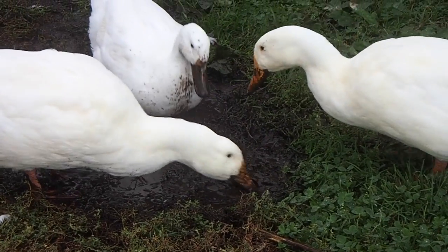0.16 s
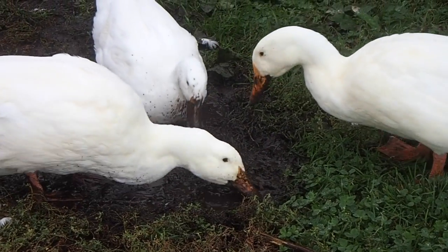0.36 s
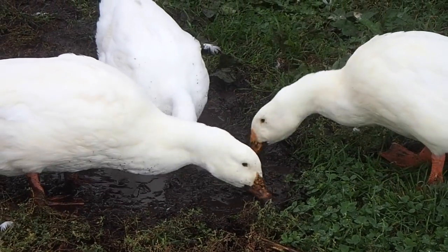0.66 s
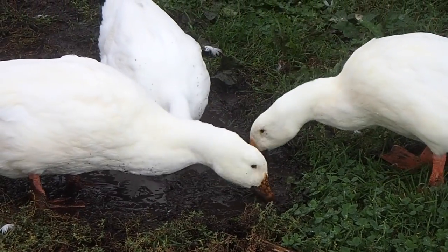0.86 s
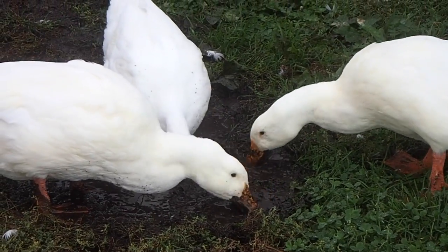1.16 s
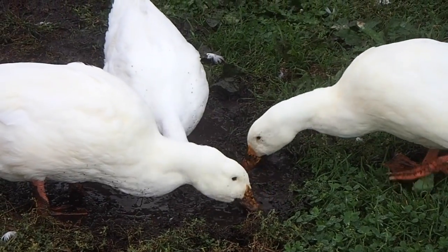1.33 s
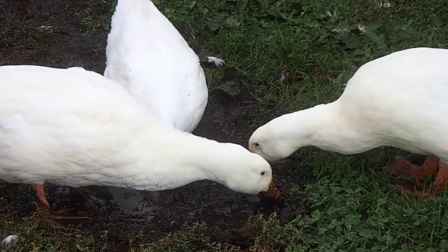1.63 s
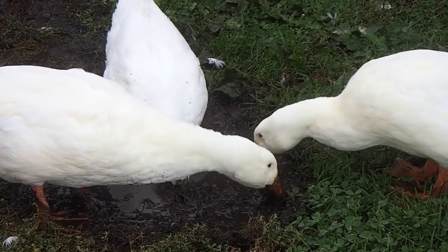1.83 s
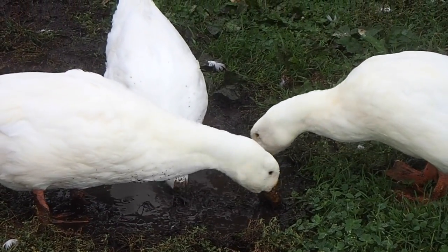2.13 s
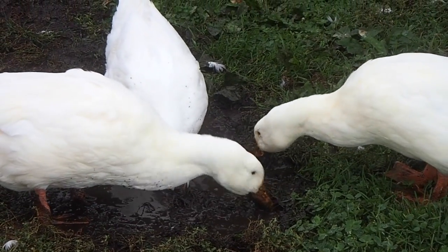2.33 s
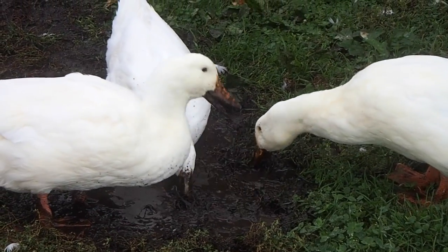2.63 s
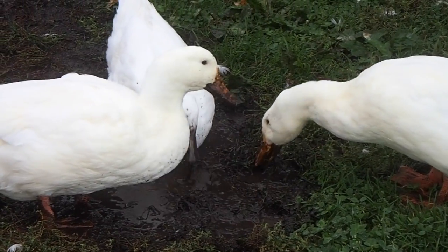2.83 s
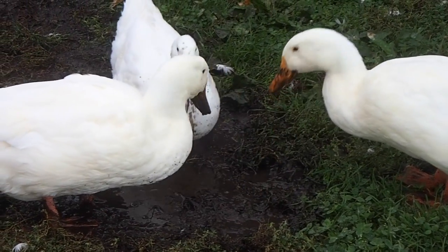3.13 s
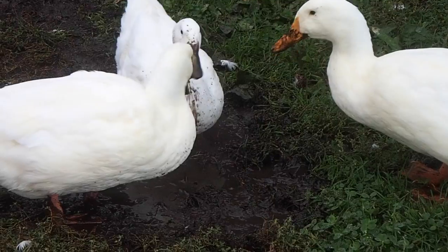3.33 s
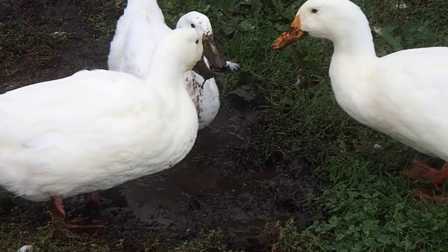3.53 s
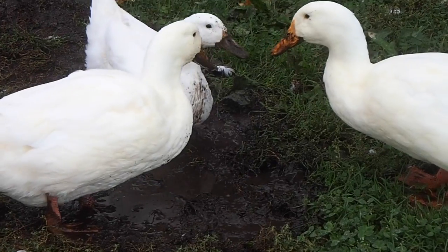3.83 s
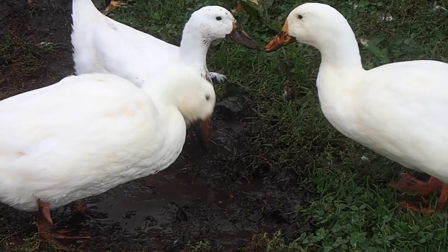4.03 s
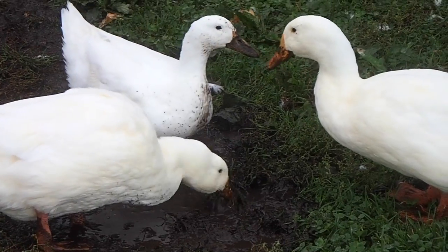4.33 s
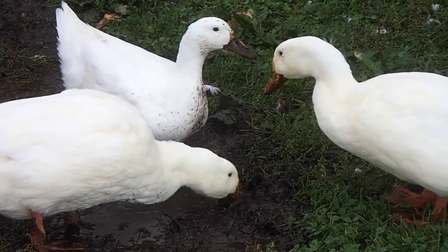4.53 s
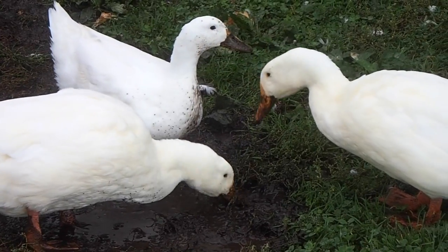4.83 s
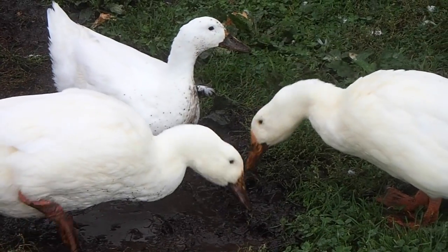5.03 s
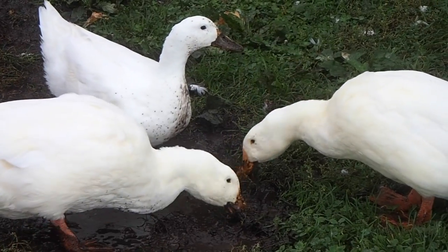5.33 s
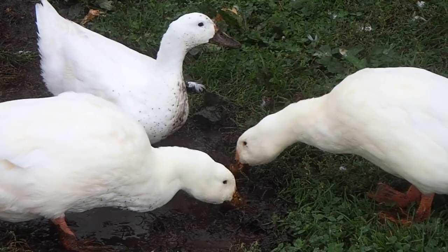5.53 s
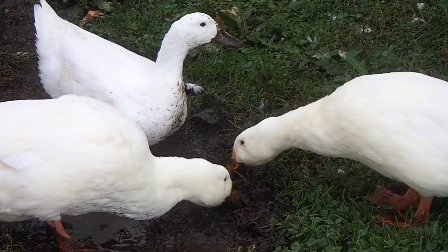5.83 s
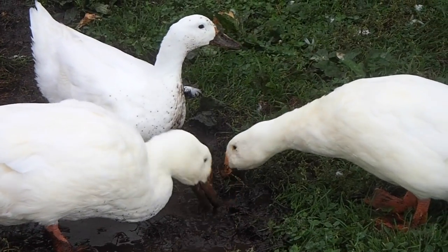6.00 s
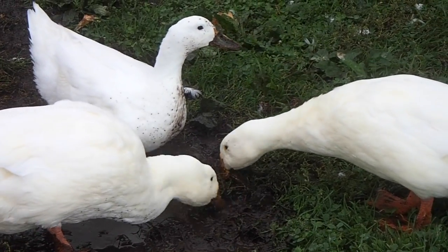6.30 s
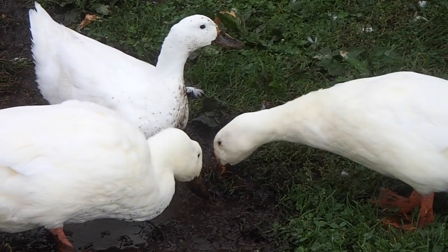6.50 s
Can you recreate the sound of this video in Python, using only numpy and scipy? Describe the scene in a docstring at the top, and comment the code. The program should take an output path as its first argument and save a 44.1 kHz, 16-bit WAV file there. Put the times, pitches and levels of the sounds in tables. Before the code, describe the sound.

Ducks dabble in wet mud outdoors, about a step from the microphone. From 0.2 seconds their bills make a fast irregular chatter of wet smacks, crackles and dull squelches, about fifteen a second, with small bubble plips. It breaks briefly at 1.5 seconds, then grows louder until 2.6. Short, soft, hoarse quacks are muttered in the first second or so and come forward between 2.6 and 4.4 seconds, strongest near 3.7, while the mud goes almost quiet. Dabbling returns from 4.3 to 4.7, most densely from 5.2 to 6 with a clear pop near 5.9, and again from 6.2 to the end at about 6.7, with quieter quacks in between. A light breeze gives the microphone several dull low bumps between 0.8 and 4.3 seconds. A low outdoor rumble, faint hiss and distant machinery hum continue underneath.

```python
"""Ducks dabbling in mud

White ducks work wet mud on a lawn, a step away. Their bills chatter about 15 times a second:
each closing tears a film of mud with a wet smack, and air bubbles pop in the slurry.
They mutter soft hoarse quacks; a light breeze nudges the microphone and machinery hums far away."""
import sys
import numpy as np
from scipy import signal
from scipy.fft import rfft, irfft
from scipy.io import wavfile

SR = 44100
rng = np.random.default_rng(int(sys.argv[2]) if len(sys.argv) > 2 else 0)


def store_pcm(level_fs):
    """Save levels as 16-bit WAV."""
    pcm = np.round(np.clip(level_fs, -1, 1) * 32767).astype(np.int16)
    wavfile.write(sys.argv[1], SR, np.atleast_2d(pcm).T)


N = 293706

# the microphone port rings near 5 kHz, with a notch on either side: freq_hz, gain_db
PORT_EQ = [(2000, 0), (2700, -4), (3450, 1), (3900, -13), (4200, -11), (4700, 6), (5350, 12.5), (5850, 8),
           (6060, 2), (6160, -10), (6280, 2), (7100, 1), (7900, 4), (9300, -4), (16000, -5)]
# the bright snap of tearing mud: freq_hz, gain_db
SNAP_EQ = [(300, -25), (2500, -13), (4200, 0), (5300, 3.5), (6500, 0.5), (8000, -1.5), (10000, -10),
           (16000, -14.5)]
# the dull squelch under it: freq_hz, gain_db
SQUELCH_EQ = [(100, -29), (400, -6.5), (900, -1), (1500, -0.5), (2100, -2), (3400, -5.5), (4500, -13.5),
              (9000, -75)]
# bouts of dabbling: start_s, end_s, stir_db (with the bill at its deepest)
BOUTS = [(.22, 1.49, -45.5), (1.619, 2.63, -45), (4.258, 4.73, -46.5), (5.181, 5.95, -41.5),
         (6.218, 6.66, -46.5)]
CHATTER_HZ = 15  # bill closings


def gain_of(db):
    """Decibels to gain."""
    return 10 ** (np.asarray(db) / 20)


def unit_rms(x):
    """Scales to rms 1."""
    return x / np.sqrt(np.mean(x ** 2) + 1e-20)


def curve_at(points, hz):
    """Reads a curve on a log-frequency axis."""
    freqs, values = np.transpose(points)
    return np.interp(np.log(hz + 1), np.log(freqs + 1), values)


def drift(hz):
    """Smooth random motion of rms 1, up to about hz."""
    lowpass = np.exp(-(np.fft.rfftfreq(N, 1 / SR) / hz) ** 2)
    return unit_rms(irfft(rfft(rng.standard_normal(N)) * lowpass, N))


def swell(at_s, width_s):
    """A smooth rise and fall of height 1."""
    return np.exp(-((np.arange(N) / SR - at_s) / width_s) ** 2)


def add(mix, start_s, sound):
    """Lays a sound into the mix."""
    part = mix[max(round(start_s * SR), 0):][:len(sound)]
    part += sound[:len(part)]


def port_click(eq, tint_db=0, dull_db=0, size=2048):
    """A click ringing the microphone port; the tint is the broad random colour of a mud cavity."""
    hz = abs(np.fft.fftfreq(size, 1 / SR))
    knots_hz = np.geomspace(400, 16000, 18)
    tint = tint_db * np.interp(hz, knots_hz, rng.uniform(-1, 1, len(knots_hz)))
    treble_cut = dull_db * np.interp(hz, [5800, 8500], [0, 1])
    log_gain = np.log(gain_of(curve_at(eq, hz) + curve_at(PORT_EQ, hz) + tint - treble_cut))
    minimum_phase = np.exp(np.conj(signal.hilbert(log_gain)))
    return np.fft.ifft(minimum_phase).real[:size // 2]


def background_bed(level_db=-44.0, fade_db_per_s=0.19, swell_db=2):
    """A bed of centred rumble and wide hiss that swells once early on and slowly fades."""
    # tone of the steady background, low outdoor rumble and microphone hiss: freq_hz, gain_db
    bed_eq = [(15, -34), (35, -8), (75, -0.5), (160, -1), (220, -7.5), (300, -5), (400, -9), (700, -13.5),
              (1200, -16.5), (2000, -26), (3400, -30.5), (5400, -30), (9000, -26.5), (16000, -29.5)]
    # likeness of left and right: freq_hz, correlation
    stereo_likeness = [(25, 0.93), (140, 0.93), (300, 0.91), (1400, 0.85), (3000, 0.9), (5300, 0.17),
                       (8000, 0), (14000, 0)]
    hz = np.fft.rfftfreq(N, 1 / SR)
    mid, side = rfft(rng.standard_normal((2, N)))
    likeness = np.clip(curve_at(stereo_likeness, hz), 0, 1)
    spectrum = np.sqrt(1 + likeness) * mid + np.array([[1], [-1]]) * np.sqrt(1 - likeness) * side
    bed = irfft(spectrum * gain_of(curve_at(bed_eq, hz) + curve_at(PORT_EQ, hz)), N)
    db = level_db - fade_db_per_s * np.arange(N) / SR + swell_db * swell(at_s=0.89, width_s=0.36)
    return gain_of(db) * unit_rms(bed)


def far_machinery(fade_db_per_s=0.4, waver_hz=1.133, swell_db=2, whine_hz=490, whine_db=-53.5):
    """Low wavering tones slowly fade; a thin whine comes and goes once."""
    # tones of the hum: pitch_hz, level_db
    hum_tones = [(70.5, -52.5), (123.8, -59.5), (168, -57.5), (290, -63), (317, -61.5)]

    def tone(hz):
        phase = 2 * np.pi * np.cumsum(hz + waver_hz * drift(5.0)) / SR
        return np.sqrt(2) * np.sin(phase) * gain_of(2 * drift(3.7))
    hum = sum(gain_of(db) * tone(hz) for hz, db in hum_tones)
    hum *= gain_of(swell_db * drift(3.5) - fade_db_per_s * np.arange(N) / SR)
    whine = gain_of(whine_db) * swell(at_s=0.83, width_s=0.33) * tone(whine_hz)
    return hum + whine


def wind(calm_db=-56.5, rumble_trim_db=-4.5, puff_rise_s=0.0051):
    """Eddies press on each microphone port separately: a low rumble, now and then a dull bump."""
    # tone of the rumble: freq_hz, gain_db
    rumble_eq = [(12, -21), (35, -7), (70, 1), (130, -6), (220, -29), (500, -50), (2000, -80)]
    # gusts rising out of the breeze: peak_s, level_db (before the trim)
    gusts = [(.85, -46), (1.37, -46), (2.32, -40), (3.2, -46), (4.25, -54)]
    # puffs that hit one port: peak_s, level_db, pitch_hz, side (-1 left, 1 right)
    puffs = [(.805, -24, 96, 1), (1.278, -27, 85, 1), (1.345, -28.5, 75.5, 1), (2.11, -27.5, 120, 1),
             (2.616, -28, 60, 1), (2.785, -30.5, 90, 1), (3.243, -26, 81, 1), (4.202, -25, 116, -1),
             (4.288, -25.5, 75.4, -1)]
    shape = gain_of(curve_at(rumble_eq, np.fft.rfftfreq(N, 1 / SR)))
    rumble = unit_rms(irfft(rfft(rng.standard_normal((2, N))) * shape, N))
    breeze = gain_of(calm_db) + sum(gain_of(db) * swell(peak_s, width_s=0.22) for peak_s, db in gusts)
    out = gain_of(rumble_trim_db) * breeze * rumble
    t = np.arange(SR // 8) / SR
    for peak_s, db, hz, side in puffs:
        bump = t / puff_rise_s * np.exp(1 - t / puff_rise_s) * np.sin(2 * np.pi * hz * t)
        add(out[int(side > 0)], peak_s - puff_rise_s, gain_of(db) * bump)
    return out


def quacks(pulse_hz=72, arch=0.0996, peak_at=0.419, chirp=0.043, brighten_db=30, tint_db=3.0):
    """Slow uneven pulses of the syrinx ring a throat that opens and shuts, each with a puff of air."""
    # muttered calls: start_s, end_s, level_db, mouth_opening (wider is higher and brighter)
    calls = [(0.166, .244, -54.5, 0.89), (0.263, 0.346, -48, 0.74), (.457, 0.558, -46.5, 0.79),
             (.693, 0.771, -49.5, 0.92), (.893, 1, -53, .75), (1.179, 1.26, -47.5, 0.96),
             (2.638, 2.722, -49.5, 0.97), (2.829, 2.91, -51.5, 0.79), (3.011, 3.07, -42, 0.84),
             (3.051, 3.122, -46.5, 1.02), (3.215, 3.277, -44, 1.03), (3.495, 3.564, -41.5, 1.016),
             (3.618, 3.687, -50, 0.86), (3.697, 3.808, -38.5, .95), (4.009, 4.058, -43, 1.05),
             (4.131, 4.219, -44, .8), (4.352, 4.433, -44, 0.94), (4.507, 4.676, -52, 0.77),
             (4.743, 4.872, -45, .98), (4.972, 5.052, -49, .92), (5.109, 5.178, -46.5, 0.85),
             (5.28, 5.362, -52.5, 0.99), (5.71, 5.804, -50, 0.95), (5.828, 5.934, -50.5, 0.87),
             (6.089, 6.156, -54, 0.89), (6.449, 6.539, -53.5, 0.72), (6.57, 6.65, -52, 0.83)]
    # throat resonances: freq_hz, width_hz, gain_db
    throat = [(1300, 125, 3), (1564, 116, 6.5), (2059, 110, 6), (2603, 245, -4.5), (3370, 460, -11.5),
              (5140, 727, -14.5)]
    out, port = np.zeros(N), port_click([(20, 0), (20000, 0)])
    pulse_phase = 2 * np.pi * np.cumsum(pulse_hz * (1 + .16 * drift(40))) / SR
    breath, waver = rng.standard_normal(N), drift(161)
    for start, end, db, mouth in calls:
        span = slice(round((start - .01) * SR), round((end + 0.017) * SR))
        cycle = pulse_phase[span]
        opening = np.sin(np.pi * np.interp(np.linspace(0, 1, len(cycle)), [0, peak_at, 1], [0, .5, 1]))
        # the resonances arch over the call and glide up within each pulse
        bend = np.sqrt(mouth) * (1 + arch * (opening - 1) - chirp * np.sin(cycle))
        voice = 0
        for (hz, width_hz, mode_db), tint in zip(throat, rng.uniform(-1, 1, len(throat))):
            octaves = np.log2(min(hz, 2200) / 1600)
            pulses = .2 + np.sin(cycle / 2 - .45 * octaves) ** 2  # low resonances speak first
            ring_hz = hz * bend + width_hz / 2 * np.roll(waver, round(hz))[span]
            ring = np.sin(2 * np.pi * np.cumsum(ring_hz) / SR)
            rasp = unit_rms(resonate(breath[span], hz * bend, width_hz))
            tone = ring + .2 * (hz / 1600) ** 2 * rasp  # high resonances are breathier
            gain = gain_of(mode_db + tint_db * tint + brighten_db * (mouth - 1) * octaves)
            voice += gain * tone * pulses * opening ** (1.0 + hz / 2500)
        call = signal.fftconvolve(voice, port)[:len(cycle)]
        add(out, start - .01, gain_of(db) * unit_rms(call))
    return out


def resonate(x, hz, width_hz):
    """A steep resonance of gain 1 that follows the curve hz."""
    carrier = np.exp(2j * np.pi * np.cumsum(hz) / SR)
    pole = np.exp(-np.pi * width_hz / SR)
    return 2 * (carrier * signal.lfilter([(1 - pole) ** 2], [1, -2 * pole, pole ** 2], x / carrier)).real


def stirring(dig_db=4.5, dip_s=.06, settle_s=0.15, seep_db=-66):
    """Mud activity as a gain: it builds as the bill digs in and settles to a seep when it lifts."""
    t, out = np.arange(N) / SR, gain_of(seep_db)
    for start, end, db in BOUTS:
        fades = np.exp(np.minimum(t - start, 0) / dip_s - np.maximum(t - end, 0) / settle_s)
        build = gain_of(db - dig_db * np.interp(t, [start, end], [1, 0]))
        out = np.maximum(out, fades * build)
    return out


def mud_crackle(bursts_per_s=260, spread_db=4.5, chatter_db=4, burst_s=0.00079, cavities=14):
    """Tiny films burst all through the stirred mud, in waves at about the rate of the bills."""
    chatter_phase = 2 * np.pi * np.cumsum(CHATTER_HZ * (1 + 0.1942 * drift(4.34))) / SR
    chatter = gain_of(chatter_db * np.sin(chatter_phase))
    burst = np.exp(-abs(np.arange(-SR // 200, SR // 200)) / SR / burst_s)
    snaps, squelches = np.zeros((2, N))
    for _ in range(cavities):
        triggers = rng.random(N) < bursts_per_s / cavities / SR
        sizes = triggers * gain_of(spread_db * np.minimum(rng.exponential(1, N), 4))
        tears = signal.oaconvolve(sizes * chatter, burst, "same") * rng.standard_normal(N)
        snaps += signal.oaconvolve(tears, port_click(SNAP_EQ, tint_db=10))[:N]
        squelches += signal.oaconvolve(tears, port_click(SQUELCH_EQ, tint_db=10))[:N]
    return stirring() * (gain_of(-3) * unit_rms(snaps) + gain_of(-9) * unit_rms(squelches))


def light_closings(loud_times, jitter_s=.012, snap_db=-44.5, squelch_db=-52.5, length_s=0.0036):
    """Rows of faint smacks: the bill keeps closing through each bout, between the loud ones."""
    beats = np.concatenate([np.arange(start, end, 1 / CHATTER_HZ) for start, end, _ in BOUTS])
    rows = []
    for beat, (late, snap, squelch, stretch) in zip(beats, rng.standard_normal((200, 4))):
        if abs(loud_times - beat).min() > .25 / CHATTER_HZ:
            rows.append((beat + jitter_s * late, snap_db + 2 * snap,
                         squelch_db + 2 * squelch, length_s * 2 ** stretch))
    return rows


def bill_smacks(crumbs_per_s=3000, clean_s=0.0009, smear_s=0.00059, squelch_trim_db=1):
    """A film of mud tears in one snap amid smaller ones; the longer the smack, the more even they are."""
    # the loudest closings: time_s, snap_db, squelch_db (before the trim), length_s
    loud_smacks = [(0.332, -31.5, -61, 0.0054), (.583, -39, -45.5, 0.00085), (0.658, -40, -48, .002),
                   (0.763, -36.5, -64, .005), (0.998, -34, -45, 0.0073), (1.05, -36.5, -42, 0.0033),
                   (1.139, -37, -42, 0.008), (1.173, -35.5, -49, 0.0025), (1.198, -35.5, -57, 0.0024),
                   (1.217, -35, -47, 0.0076), (1.293, -36, -38.5, 0.0036), (1.315, -41.5, -36, 0.011),
                   (1.357, -33.5, -50, 0.0011), (1.42, -34.5, -41.5, 0.0078), (1.445, -29, -36, .001),
                   (1.6574, -32, -36.5, 0.0077), (1.864, -33, -42, .003), (1.92, -33, -35.5, 0.0014),
                   (1.984, -29, -39.5, .011), (2.0874, -28.5, -43, .003), (2.101, -33.5, -40.5, 0.0047),
                   (2.1641, -26, -41.5, 0.006), (2.234, -29.5, -38, 0.014), (2.296, -26.5, -34, 0.0064),
                   (2.379, -43, -44, 0.0008), (2.4313, -26, -38.5, 0.0033), (2.5006, -23, -32, .0013),
                   (2.613, -40, -67, 0.0012), (2.6343, -22.5, -39, 0.00078), (2.788, -45.5, -44.5, 0.0022),
                   (3.819, -45, -59, 0.019), (4.276, -39.5, -46, 0.0011), (4.342, -36, -44, .006),
                   (4.3854, -34, -38, .003), (4.418, -28.5, -44, 0.0056), (4.468, -35, -46, 0.0068),
                   (4.4964, -38, -63, 0.0021), (4.542, -41, -42.5, .0024), (4.566, -36.5, -49, .006),
                   (4.6378, -39, -60, 0.0011), (4.6897, -37.5, -33, 0.0026), (4.726, -34, -44, .005),
                   (5.202, -39, -51, 0.015), (5.314, -34.5, -40.5, 0.014), (5.3685, -25.5, -39.5, 0.0026),
                   (5.44, -35, -39.5, .008), (5.473, -29.5, -40.5, 0.0021), (5.507, -33.5, -40, 0.0039),
                   (5.584, -36.5, -40, 0.0034), (5.612, -43, -45, .003), (5.65, -32.5, -43.5, 0.0048),
                   (5.716, -31, -36.5, 0.0026), (5.778, -33, -53, 0.011), (5.813, -32, -45, 0.0065),
                   (5.85, -29, -39, 0.0016), (5.8614, -26.5, -46, 0.0008), (5.9106, -22.5, -42, 0.0053),
                   (5.976, -39.5, -44, 0.011), (6.24, -36.5, -45, .01), (6.268, -32, -48.5, 0.0049),
                   (6.5939, -30, -44.5, 0.0031), (6.626, -36, -46.5, 0.011)]
    light_smacks = light_closings(np.array(loud_smacks)[:, 0])
    out, t = np.zeros(N), np.arange(-SR // 50, SR // 25) / SR
    for time_s, snap_db, squelch_db, length_s in loud_smacks + light_smacks:
        tint_db = np.interp(snap_db, [-36, -24], [9, 2])  # small tears are strongly coloured
        dull_db = np.interp(snap_db, [-34, -23], [-2.5, 5])  # big ones are slower, so duller
        snap = (SNAP_EQ, snap_db, length_s)
        squelch = (SQUELCH_EQ, squelch_db + squelch_trim_db, length_s + smear_s)
        for eq, db, span_s in (snap, squelch):
            envelope = np.exp(-abs(t) / (span_s * np.where(t < 0, 0.37, .6) + 1e-5))
            crumbs = rng.standard_normal(len(t)) * (rng.random(len(t)) < crumbs_per_s / SR) * envelope
            main_tear = (t == 0) * (clean_s / (span_s + 1e-5) + 0.17)
            tears = main_tear + crumbs / (np.linalg.norm(crumbs) + 0.065)
            smack = signal.fftconvolve(tears, port_click(eq, tint_db, dull_db))
            smack *= np.sqrt(SR / 100) / np.linalg.norm(smack)  # the energy of 10 ms at rms 1
            add(out, time_s + t[0], gain_of(db) * smack)
    return out


def bubble(db, hz, t60_s, rise_octaves):
    """A pocket of air rings and rises in pitch as it opens."""
    t = np.arange(0, t60_s, 1 / SR)
    envelope = gain_of(db - 60 * t / t60_s) * (1 - np.exp(-t / 0.000066))
    pitch_hz = hz * 2 ** (rise_octaves * t / t60_s)
    return envelope * np.sin(2 * np.pi * np.cumsum(pitch_hz) / SR)


def bubbles(plip_trim_db=2, rise_octaves=.14, damped_t60_s=0.017, small_count=90):
    """A few clear plips, and many small ones damped by the thick slurry, louder while it is stirred."""
    # the clearest bubbles: start_s, level_db (before the trim), pitch_hz, t60_s
    plips = [(.629, -32, 2820, .011), (1.355, -25, 1345, 0.027), (1.775, -33, 1770, 0.017),
             (1.917, -33, 1600, .02), (1.931, -32, 1770, .02), (2.555, -26.5, 1800, .0095),
             (4.539, -33, 900, .04), (5.209, -32, 2530, 0.0071), (5.85, -19, 1870, 0.0085),
             (6.017, -27.5, 2000, 0.0048)]
    out, stir_db = np.zeros(N), 20 * np.log10(stirring())
    for start_s, db, hz, t60_s in plips:
        add(out, start_s, bubble(db + plip_trim_db, hz, t60_s, rise_octaves))
    for when, strength, pitch, rise in rng.random((small_count, 4)):
        db = stir_db[int(when * N)] + 5 + 8 * strength
        add(out, when * N / SR, bubble(db, 800 * 2.7 ** pitch, damped_t60_s, rise_octaves * rise))
    return out


def yard_scatter(x, wet_db, t60_s, width=0.05):
    """Weak short reflections off the ground, the birds and the plants; mono in, stereo out."""
    t = np.arange(SR // 3) / SR
    taps = rng.standard_normal((3, len(t))) * (rng.random((3, len(t))) < 3000 / SR)
    taps *= (t > .002) * gain_of(-60 * t / t60_s)
    tail = taps[0] + width * taps[1:]
    wet = signal.oaconvolve(x[None], tail / np.linalg.norm(tail[0]), axes=1)[:, :N]
    return x + gain_of(wet_db) * wet


def scene():
    """The bills work close by in the middle, the quacks a little more distant, over wind and hum."""
    mud = yard_scatter(bill_smacks() + mud_crackle() + bubbles(), wet_db=-14.5, t60_s=0.087, width=0.21)
    mud *= gain_of([[.2], [-.2]])  # a hair to the left
    voices = yard_scatter(quacks(), wet_db=-9.5, t60_s=0.17)
    return mud + voices + wind() + far_machinery() + background_bed()


def record(dry):
    """A small camera's band limit shaves off the top treble."""
    lowpass = signal.firwin(255, 15900, window=("kaiser", 8), fs=SR)
    return signal.oaconvolve(dry, lowpass[None], "same")


dry = scene()
out = record(dry)
store_pcm(out)
```